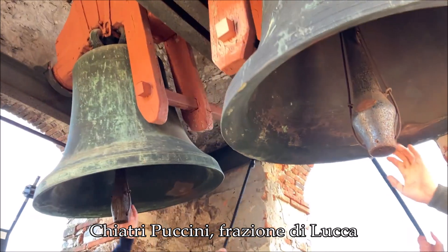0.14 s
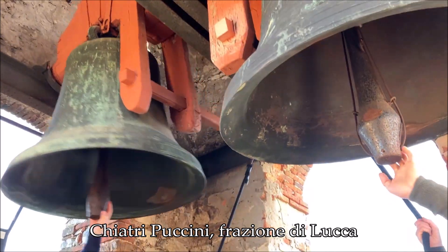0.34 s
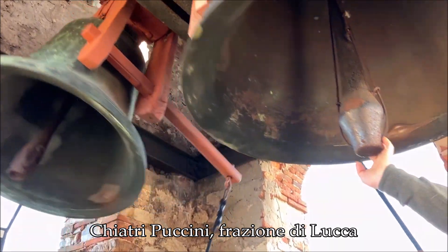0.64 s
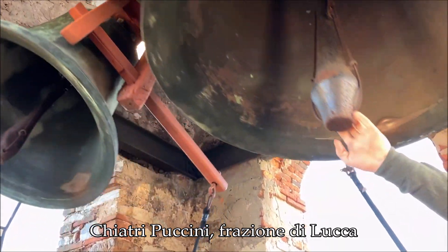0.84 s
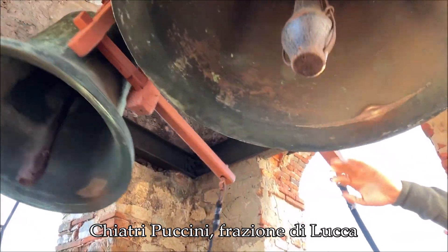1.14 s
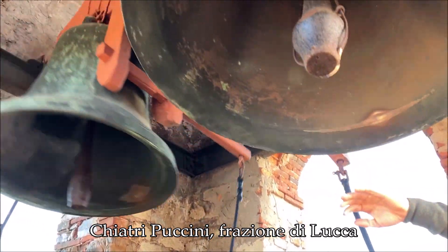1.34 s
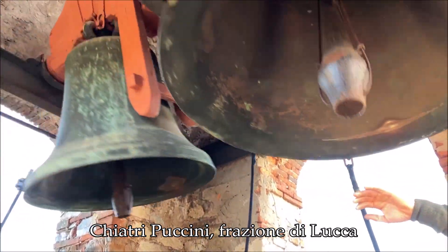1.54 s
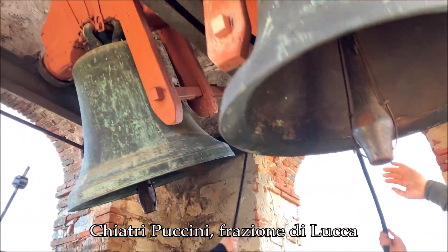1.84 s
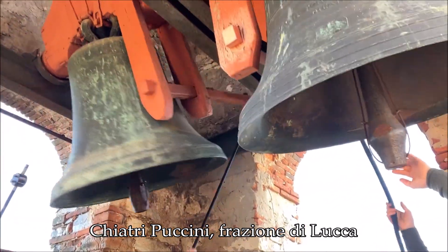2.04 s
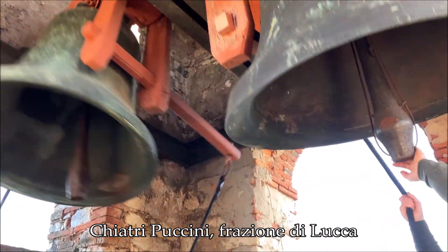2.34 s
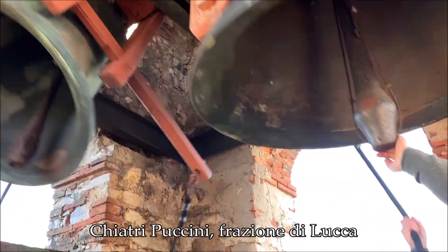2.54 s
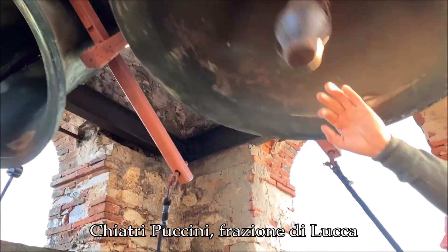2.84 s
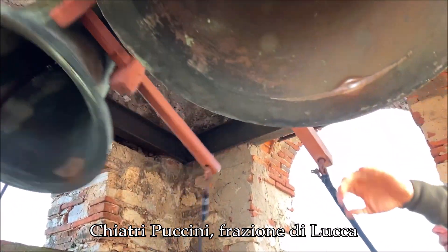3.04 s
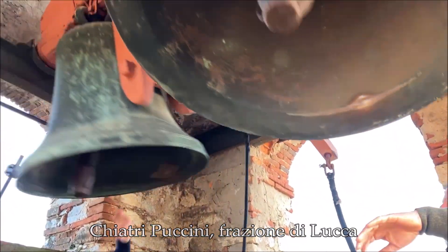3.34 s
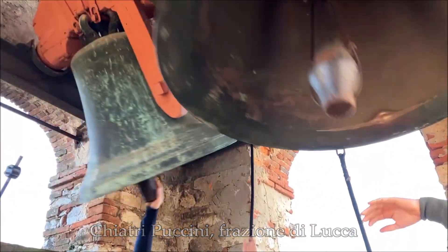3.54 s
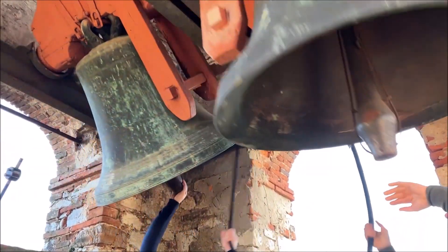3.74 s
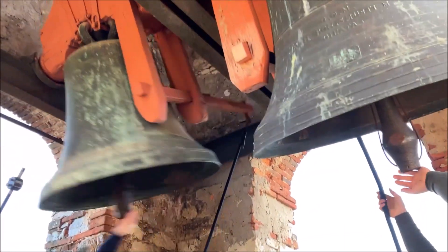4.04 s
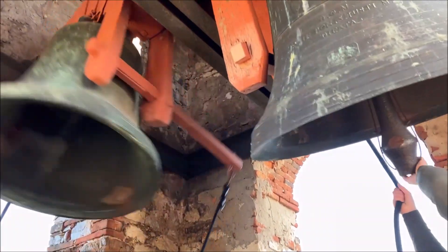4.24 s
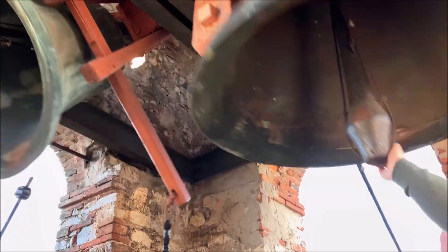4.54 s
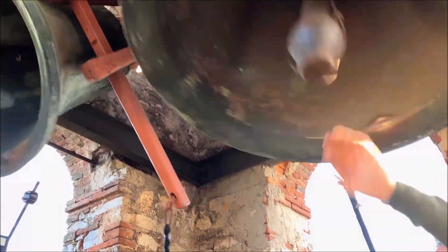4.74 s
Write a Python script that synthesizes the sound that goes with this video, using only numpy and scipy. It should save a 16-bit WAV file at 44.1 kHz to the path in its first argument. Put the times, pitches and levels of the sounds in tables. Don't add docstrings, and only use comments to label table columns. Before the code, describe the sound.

In an open stone belfry, bells swing by hand without sounding; one hears their wooden and iron mounts close to a stereo microphone. Faint rattles and a low creak open the scene, with a cluster of wooden knocks around 0.5-0.6 s. At about 0.85 s a hard, bright iron slam and tick bounce at once and ring briefly. Sparser strap knocks and light ticks follow from 1.2 to 1.9 s. Around 2.2-2.5 s come woody creaks, hollow thuds and a clank. Softer taps and a faint rising whine pass near 3 s, small pings at 3.4 s and a low groan at 3.5 s. From 3.7 to 4.3 s knocks and clanks crowd together, then a lighter slam at 4.5 s and last knocks near 4.7 s. Rope and sleeves rustle throughout; low wind buffets, strongest around 3.6 and 4.1 s, over faint outdoor hush and short wall echoes.

```python
import sys
import numpy as np
from scipy import signal
from scipy.fft import rfft, irfft
from scipy.io import wavfile
from scipy.ndimage import uniform_filter1d

SR = 44100
rng = np.random.default_rng(int(sys.argv[2]) if len(sys.argv) > 2 else 0)


def boost(x):
    u = np.asarray(x, float) / 20
    return 10 ** u


def store_wav(level_fs):
    pcm = np.round(np.clip(np.atleast_2d(level_fs), -1, 1) * 32767)
    wavfile.write(sys.argv[1], SR, pcm.T.astype(np.int16))


N = 215119

# pitch in Hz, level in dB, t60 in seconds.
BEAM_MODES = [(264, -1.5, 0.065), (339, -0.5, 0.1), (404.3, 0, 0.072), (458, -8, 0.034), (593, -12, 0.012)]
# pitch in Hz, level in dB, t60 in seconds.
PLANK_MODES = [(700, -4, .025), (803, 0, .035), (910, -2, .025), (1027, 0, .035), (1150, -2, .025),
               (1270, -2, .025), (1363, 0, .03), (1490, -2, .025)]
# pitch in Hz, level in dB, t60 in seconds.
IRON_MODES = [(1590, -1, .02), (1700, -1, .02), (1895, 0, .022), (2100, -2, .018), (2340, -2, .018),
              (2520, 0, .022), (2750, -2, .02), (2950, -5, .015), (3250, -7, .015), (3550, -7, .015),
              (3870, -8, .015), (4200, -9, .015), (4550, -8, .015)]
# frequency in Hz, level in dB per Hz.
SNAP_SPECTRUM = [(3000, -6.5), (4800, 9), (5500, 10), (7000, 9.5), (8000, -1), (10000, -5), (11700, 2.5),
                 (12300, -36)]

# start in seconds, beam level in dB, fitting level in dB, rattle t60 in seconds.
WOODEN_KNOCKS = [(.079, -57, -57.5, 0.49), (0.4883, -43, -43, 0.027), (0.5299, -51, -78, 0.21),
                 (0.6209, -54, -54.5, 0.14), (1.171, -72, -52.5, 0.034), (2.1699, -52.5, -86, 0.02),
                 (2.2439, -44.5, -44, 0.011), (2.2886, -47, -73, 0.03), (2.4382, -48, -57, 0.14),
                 (3.7483, -51, -50, 0.046), (3.82, -46, -43.5, 0.032), (3.966, -49, -52, 0.041),
                 (4.099, -53, -53.5, 0.11), (4.2343, -41, -66, 0.034), (4.6278, -58, -55, 0.51),
                 (4.7093, -46.5, -55, 0.046)]
# start in seconds, beam level in dB, fitting level in dB, rattle t60 in seconds.
STRAP_KNOCKS = [(0.5771, -44.5, -47.5, 0.076), (1.251, -55, -42, .14), (1.8696, -56.5, -56.5, 0.16),
                (2.4827, -47.5, -53.5, 0.12), (2.655, -84, -70, .1), (2.765, -79, -75, 0.04),
                (3.0393, -52.5, -67.5, 0.15), (3.3956, -48.5, -55.5, 0.06), (3.149, -57.5, -67.5, 0.12),
                (3.71, -54.5, -43, 0.079), (4.039, -80, -58, 0.11)]
# start in seconds, beam level in dB, fitting level in dB, rattle t60 in seconds.
IRON_CLANKS = [(0.1217, -50.5, -53, 0.18), (0.173, -62, -58.5, 0.18), (0.8389, -75, -34, 0.11),
               (2.3994, -41.5, -38, 0.02), (1.5989, -61.5, -63, 0.16), (2.1275, -61, -61.5, 0.11),
               (3.8322, -44, -38.5, 0.062), (3.878, -46, -50, 0.06), (4.1686, -46, -38.5, 0.011),
               (4.2082, -39.5, -37, 0.074), (4.2854, -43, -39, 0.016), (4.6778, -46, -45.5, 0.042)]
# start in seconds, beam level in dB, fitting level in dB, rattle t60 in seconds.
HOOK_TICKS = [
    (0.7612, -73, -58, 0.1),
    (0.8616, -45, -28, 0.072),
    (0.91, -66, -42.5, 0.17),
    (1.3305, -78, -52, 0.23),
    (1.552, -70, -55.5, 0.06),
    (1.799, -81, -60.5, 0.12),
    (4.3291, -51.5, -53.5, 0.036),
    (4.4452, -79, -59, 0.51),
]
# start in seconds, beam level in dB, fitting level in dB,
# rattle t60 in seconds.
LEVER_SLAMS = [
    (.843, -46.5, -30, .07),
    (.853, -58, -28, .05),
    (3.0835, -59, -57, .04),
    (4.5054, -60.5, -53, 0.11),
]
# snap level in dB, plank level in dB, iron level in dB.
BLOW_SHARES = [
    (-25, -0.5, -9.5),
    (-18, 0.5, 1),
    (-0.5, -2, -3),
    (0, -20, -12),
    (2.5, -13, -5),
]

# start in seconds, pitch in Hz, level in dB, t60 in seconds.
TAPPED_RINGS = [(.272, 392.7, -40, 0.1), (.49, 1875, -47, 0.04), (.49, 980, -45, .08),
                (.582, 1910, -43, 0.052), (.846, 1364, -34, 0.075), (.846, 1031, -34.5, 0.09),
                (.846, 2476, -28, 0.071), (1.872, 813, -48.5, 0.13), (2.243, 875, -29, 0.03),
                (2.4, 2577, -30.5, 0.034), (2.964, 2283, -58, 0.073), (.846, 1942, -32.5, 0.081),
                (4.212, 933, -38, 0.1), (4.29, 797, -41, 0.095), (3.709, 1675, -35.5, 0.033),
                (3.71, 2460, -41, 0.04), (3.721, 4350, -58, .15), (4.68, 1997, -53, 0.12)]
# start in seconds, pitch in Hz, level in dB, t60 in seconds.
BEARING_CREAKS = [
    (.292, 371.4, -40.5, 0.15),
    (0.931, 1535, -64, .5),
    (.95, 1018, -64, .4),
    (.95, 2500, -67, .4),
    (2.165, 832, -42, 0.12),
    (2.19, 356, -42, 0.17),
    (2.3, 350, -32.5, 0.089),
    (2.35, 355.5, -29.5, 0.055),
    (2.56, 1273, -68, 0.26),
    (3.835, 993, -32, 0.13),
]
# start in seconds, pitch in Hz, level in dB, t60 in seconds.
FRAME_GROANS = [
    (.598, 201.6, -51.5, 0.6),
    (2.422, 127, -33, 0.067),
    (3.526, 218.7, -44.5, 0.36),
    (3.556, 185.6, -40, 0.17),
    (3.599, 158.6, -43.5, 0.16),
    (3.639, 202.5, -51.5, 0.49),
    (4.698, 257.4, -37, 0.25),
]
# start in seconds, pitch in Hz, level in dB, t60 in seconds.
HOOK_PINGS = [(3.1, 1700, -58, 0.18), (3.39, 5070, -51, 0.12), (3.392, 5140, -55, 0.33),
              (4.213, 11000, -60, 0.23), (4.445, 11400, -60, .2), (3.394, 6000, -58, 0.13),
              (4.4, 7960, -62, 0.08), (3.392, 9600, -57, 0.27), (3.398, 10250, -55, .18),
              (3.4, 3300, -62, 0.16)]
# start in seconds, pitch in Hz, level in dB, t60 in seconds.
TIMBER_THUDS = [(2.168, 370, -39, 0.08), (2.245, 450, -35, 0.062), (2.283, 355, -34, 0.058),
                (2.399, 370, -27, .04), (2.414, 270, -26, .05), (2.437, 300, -27, .06),
                (2.48, 385, -46, .1), (3.822, 406, -31, .17), (3.843, 264, -30.5, 0.18),
                (3.885, 340, -36, .08), (4.07, 400, -46.5, 0.27), (4.21, 340, -29, .15),
                (4.235, 422, -34, 0.092), (4.29, 379, -43, .1), (4.32, 482, -41.5, 0.078),
                (4.2, 560, -39.5, .12), (4.24, 620, -44, .1), (4.285, 600, -43, 0.12),
                (4.22, 220, -39, .12), (2.26, 660, -44, 0.13), (2.304, 335, -33, .07),
                (2.405, 193, -34, .08), (2.415, 680, -48.5, 0.14), (2.49, 230, -40, .12),
                (2.2, 200, -49.5, 0.21), (3.845, 680, -41, 0.11), (3.95, 350, -46, 0.13),
                (3.405, 460, -51, 0.18), (.86, 560, -43, 0.11)]
# start in seconds, pitch in Hz, level in dB, t60 in seconds.
SHORT_REBOUNDS = [(.843, 1583, -36, 0.074), (.858, 1974, -32, 0.037), (.862, 3850, -38, 0.092),
                  (.846, 5220, -36, .09), (.872, 548, -39.5, .1), (.897, 1007, -37, 0.054),
                  (.907, 1493, -35, .06), (1.172, 990, -56, 0.085), (1.249, 900, -41, 0.13),
                  (1.262, 1386, -46, 0.069), (1.262, 760, -44.5, 0.093), (1.268, 3493, -47.5, 0.12),
                  (1.36, 3510, -56, .1), (2.285, 995, -49, .08), (2.4, 866, -41, 0.042),
                  (2.404, 1850, -40, 0.069), (2.44, 845, -48, 0.07), (2.48, 1300, -50, 0.097),
                  (3.818, 813, -38, 0.071), (3.935, 820, -46, .07), (3.963, 785, -37.5, 0.12),
                  (4.015, 826, -51, .08), (4.093, 820, -40, .07), (4.122, 827, -42, 0.065),
                  (4.168, 1860, -47, .04), (4.192, 846, -43, .06), (4.208, 1087, -40, .06),
                  (4.208, 1540, -46, 0.045), (4.208, 1860, -39, 0.062), (4.68, 2495, -53, .1)]
# rise in seconds, width as a share of the pitch,
# roughness from 0 to 1.
TONE_BLURS = [
    (0.002, .11, .75),
    (0.012, 0.045, .75),
    (0.0073, .17, .6),
    (0.003, .02, .6),
    (.008, .1, .3),
    (.005, .1, .6),
]
# start in seconds, length in seconds, start pitch in Hz,
# end pitch in Hz, level in dB.
BEARING_WHINES = [
    (2.889, 0.172, 1070, 1174, -66),
    (2.954, .11, 2280, 2360, -68),
]

# fastest moment in seconds, level in dB.
ROPE_PULLS = [(.2, -63), (.69, -58), (1.21, -56), (1.37, -61), (2.35, -51), (2.54, -75), (3.0, -55.5),
              (3.33, -60.5), (3.8, -53.5), (4.11, -49.5), (4.48, -56.5), (4.8, -52)]
# fastest moment in seconds, level in dB.
SLEEVE_BRUSHES = [(.15, -57), (.5, -57), (.88, -54.5), (1.37, -51.5), (1.9, -66), (2.4, -64), (2.85, -62),
                  (3.0, -57.5), (3.88, -54.5), (4.2, -58), (4.88, -49)]

# frequency in Hz, t60 in seconds.
WALL_DECAY = [(200, 0.3), (1000, 0.31), (3000, 0.22), (8000, 0.16)]

# frequency in Hz, level in dB per Hz.
GUST_SPECTRUM = [(22, -72), (33, -11), (45, 2), (90, 2), (115, -3), (160, -10.5), (300, -56)]
# time in seconds, level in dB.
BREEZE_LEVEL = [(0, -78), (.15, -50), (.4, -70), (.75, -49.5), (1.1, -76), (1.502, -53.5), (1.8, -71),
                (2.1, -54), (3.0, -59), (3.4, -48.5), (4.4, -43), (4.88, -45.5)]
# peak in seconds, level in dB.
WIND_BUFFETS = [(.26, -59), (.61, -40.5), (1.25, -48.5), (1.44, -61), (2.08, -46.5), (2.27, -46.5),
                (2.43, -35.5), (2.63, -46), (2.89, -51), (3.07, -49), (3.16, -41), (3.56, -31.5),
                (3.61, -34), (3.73, -42.5), (3.86, -50), (3.95, -53), (4.1, -28.5), (4.17, -43),
                (4.62, -44), (4.73, -38), (4.79, -40)]
# peak in seconds, level in dB.
FRAME_JOLTS = [(.1, -56), (.26, -69), (.48, -50), (.76, -47), (1.25, -51), (1.4, -50), (2.17, -56),
               (2.39, -43.5), (2.58, -47), (2.75, -51), (3.07, -52.5), (3.42, -44.5), (3.69, -52),
               (3.86, -43), (4.1, -42), (4.2, -44), (4.66, -43.5), (4.88, -42)]
# frequency in Hz, level in dB per Hz.
AIR_SPECTRUM = [(25, -46), (45, -8), (97, 0.5), (300, -11), (1140, -27.5), (2500, -31.5), (4200, -33.5),
                (5500, -39.5), (7000, -27.5), (9000, -39.5), (12000, -32.5)]

# frequency in Hz, share of the side that is the mid
COMMON_SIDE = [(60, .6), (300, .4), (2000, .2), (4500, .35), (6000, .7), (7000, 1.1)]
# frequency in Hz, side minus mid in dB.
SIDE_LEVEL = [(40, -11.5), (130, -18), (250, -8), (500, -5.5), (1000, -1.5), (2000, 0), (4000, 0.5),
              (6000, -1), (9000, 3), (10300, 4), (11000, -19)]
# frequency in Hz, left minus right in dB.
PORT_LEAN = [(60, 0.5), (170, -0.5), (500, 1.5), (1460, 2.5), (4230, 0), (12300, -1)]
# mid 0 or side 1, low edge in Hz, high edge in
# Hz.
EMPTY_BANDS = [(0, 8400, 9900), (0, 11850, 14000), (1, 6700, 7650), (1, 10450, 14000)]
# frequency in Hz, share of the time.
BAND_DROPOUTS = [(1500, 0), (2500, .06), (4500, .13), (5500, .33), (6300, .12), (8000, .05), (12000, .06)]


def evened(x):
    return x / np.sqrt(np.mean(x ** 2) + 1e-20)


def read(points, hz):
    f, value = np.transpose(points)
    return np.interp(np.log(hz + 1), np.log(f + 1), value)


def add(mix, s, sound):
    part = mix[round(s * SR):][:len(sound)]
    part += sound[:len(part)]


def coloured(x, points):
    return irfft(rfft(x) * boost(read(points, np.fft.rfftfreq(len(x), 1 / SR))), len(x))


def lumpy(per_s, depth_db):
    size = max(int(SR / per_s), 1)
    slow = uniform_filter1d(rng.standard_normal(N), size)
    return boost(depth_db * evened(uniform_filter1d(slow, size)))


def swells(events, rise_db_s, fall_db_s, rest_db):
    t = np.arange(0, N + 64, 64) / SR
    power = np.full(len(t), boost(2 * rest_db))
    for s, db in events:
        below_db = np.where(t < s, rise_db_s * (s - t), fall_db_s * (t - s))
        power += boost(2 * (db - below_db))
    return np.interp(np.arange(N) / SR, t, np.sqrt(power))


def ring(modes, drive, detune, crash_db, top):
    t = np.arange(4000) / SR
    body = np.zeros(len(t))
    shifts = rng.standard_normal((len(modes), 2))
    for k, ((hz, db, t60), (pitch_shift, level_shift)) in enumerate(zip(modes, shifts)):
        sign = (-1) ** k
        decay = boost(db + 1.6 * level_shift - 60 * t / abs(t60))
        body += sign * decay * np.sin(2 * np.pi * hz * (1 + detune * pitch_shift) * t)
    edges = [modes[0][0] * .85, modes[-1][0] * top]
    band = signal.butter(3, edges, "band", fs=SR, output="sos")
    loose = drive * rng.choice([-1., 1.], len(drive))
    tones = signal.fftconvolve(drive, body)[:len(drive)]
    crash = signal.sosfilt(band, loose)
    tones = tones / np.sqrt(np.mean(tones[:1200] ** 2) + 1e-20)
    crash = crash / np.sqrt(np.mean(crash[:1200] ** 2) + 1e-20)
    return tones + boost(crash_db) * crash


def knocks():
    out, t = np.zeros(N), np.arange(16000) / SR
    kinds = [WOODEN_KNOCKS, STRAP_KNOCKS, IRON_CLANKS, HOOK_TICKS, LEVER_SLAMS]
    for rows, shares in zip(kinds, BLOW_SHARES):
        for s, beam_db, fitting_db, t60 in rows:
            snap_db, plank_db, iron_db = fitting_db + np.array(shares)
            creep_db = 2600 * np.maximum(.014 - t, 0)
            decay_db = 60 * np.maximum(t - .017, 0) / max(t60, .01)
            shape = boost(-creep_db - decay_db)
            hard = rng.random(len(t)) < 2500 / SR
            blows = rng.standard_normal(len(t)) * (.7 + hard * 1.2)
            drive = blows * shape
            beam = ring(BEAM_MODES, drive, 0.029, crash_db=-2.0, top=1.144)
            plank = ring(PLANK_MODES, drive, 0.045, crash_db=0.5, top=0.96)
            iron = ring(IRON_MODES, drive, 0.04, crash_db=-4.0, top=0.86)
            snap = evened(coloured(blows, SNAP_SPECTRUM)) * shape * 1.33
            wood = boost(beam_db - 7.0) * beam + boost(plank_db - 10.5) * plank
            metal = boost(iron_db - 9.5) * iron + boost(snap_db - 11.5) * snap
            add(out, s - .012, wood + metal)
    return out


def squeaks():
    out, t = np.zeros(N), np.arange(16000) / SR
    kinds = [TAPPED_RINGS, BEARING_CREAKS, FRAME_GROANS, HOOK_PINGS, TIMBER_THUDS, SHORT_REBOUNDS]
    for rows, (rise, share, rough) in zip(kinds, TONE_BLURS):
        for s, hz, db, t60 in rows:
            size = max(int(SR / (share * hz) / 2), 1)
            chance = uniform_filter1d(rng.standard_normal((2, len(t))), size)
            blur = .85 + rough * (evened(chance[0]) + 1j * evened(chance[1]))
            tone = (blur * np.exp(2j * np.pi * hz * t)).real
            shape = boost(db - 60 * t / t60) * np.minimum(t / rise, 1) ** 2
            add(out, s, shape * tone)
    return out


def whines():
    out = np.zeros(N)
    for s, length, start_hz, end_hz, db in BEARING_WHINES:
        waver = evened(uniform_filter1d(rng.standard_normal((2, 12000)), size=220))
        u = np.clip(np.arange(12000) / SR / length, 0, 1)
        hz = (start_hz + (end_hz - start_hz) * u) * (1 + 0.013 * waver[0])
        swell = boost(db + 5.2 * waver[1]) * np.sqrt(np.sin(np.pi * u).clip(0))
        add(out, s, swell * np.sin(2 * np.pi * np.cumsum(hz) / SR))
    return out


def rustle():
    grains = rng.standard_normal((2, N)) * lumpy(120, 1.0)
    rope = coloured(grains[0], [(250, 4.5), (500, 1.5), (1200, -9.5), (3000, -20.0), (5000, -31)])
    cloth = coloured(grains[1], [(2000, 8.5), (4000, 17.5), (7500, -0.5), (10000, -7.0), (12500, 6)])
    pulls = swells(ROPE_PULLS, rise_db_s=100, fall_db_s=59, rest_db=-69)
    sleeves = swells(SLEEVE_BRUSHES, rise_db_s=114, fall_db_s=127, rest_db=-69.5)
    return boost(-3.0) * pulls * evened(rope) + boost(-10.0) * sleeves * evened(cloth)


def echo(x):
    out = np.zeros(N)
    turn = np.arange(N) / SR * 2.3
    for k in range(3):
        taps = np.zeros(SR // 2)
        at = np.arange(260, len(taps) - 20, 20)
        taps[at + rng.integers(0, 20, len(at))] = rng.choice([-1., 1.], len(at))
        hz, t, z = signal.stft(taps, SR, nperseg=256)
        decay = boost(-60 * t / read(WALL_DECAY, hz)[:, None])
        tail = signal.istft(z * decay, SR, nperseg=256)[1]
        share = np.cos(np.pi * (turn + k / 3)) * np.sqrt(2 / 3)
        out += signal.oaconvolve(x * share, tail / np.linalg.norm(tail))[:N]
    return out


def wind():
    gust = evened(coloured(rng.standard_normal(N) * lumpy(32, 0.54), GUST_SPECTRUM))
    thud = coloured(rng.standard_normal(N) * lumpy(46, 1), [(70, -61), (115, 6.0), (240, -0.5), (350, -26.0)])
    breeze = boost(np.interp(np.arange(N) / SR, *np.transpose(BREEZE_LEVEL)))
    buffets = swells(WIND_BUFFETS, rise_db_s=278, fall_db_s=289, rest_db=-85)
    jolts = swells(FRAME_JOLTS, rise_db_s=204, fall_db_s=74, rest_db=-60)
    return boost(-6.5) * np.hypot(breeze, buffets) * gust + boost(-11.0) * jolts * evened(thud)


def air():
    hz, t, z = signal.stft(coloured(rng.standard_normal(N), AIR_SPECTRUM), SR, nperseg=512)
    patches = uniform_filter1d(rng.standard_normal(z.shape), size=4, axis=0)
    patches = uniform_filter1d(patches, size=12, axis=1)
    hush = signal.istft(z * boost(2.5 * evened(patches)), SR, nperseg=512)[1][:N]
    return boost(-60.0) * evened(hush) * lumpy(0.81, 1.0)


def belfry():
    blows = knocks()
    tones = squeaks() + whines()
    walls = boost(-4.0) * echo(blows + 0.72 * tones)
    return blows + tones + walls + rustle() + wind() + air()


def scene():
    hz = np.fft.rfftfreq(N, 1 / SR)
    mid, other = rfft(belfry()), rfft(belfry())
    same = np.clip(read(COMMON_SIDE, hz), 0, 1)
    side = boost(read(SIDE_LEVEL, hz)) * (np.sqrt(1 - same ** 2) * other - 1j * same * mid)
    lean = boost(read(PORT_LEAN, hz) / 2)
    return irfft(np.array([(mid + side) * lean, (mid - side) / lean]), N)


def thinned(x):
    mid_side = np.array([x[0] + x[1], x[0] - x[1]]) / 2
    hz, t, z = signal.stft(mid_side, SR, nperseg=1024)
    luck = rng.random((2, len(hz) // 4 + 1, len(t) // 4 + 1)).repeat(4, axis=1).repeat(4, axis=2)
    keep = luck[:, :len(hz), :len(t)] > read(BAND_DROPOUTS, hz)[:, None]
    for k, (channel, low, high) in enumerate(EMPTY_BANDS):
        wander = 130 * rng.standard_normal((2, len(t) // 3 + 1)).repeat(3, axis=1)[:, :len(t)]
        band = (hz[:, None] > low + wander[0]) & (hz[:, None] < high + wander[1])
        inside = abs(z[channel][(hz > low) & (hz < high)])
        loud_db = 20 * np.log10(np.median(inside, axis=0) + 1e-10)
        usual_db = np.median(loud_db)
        attack = (loud_db - np.roll(loud_db, shift=2) > 9) & (loud_db > usual_db + 11)
        passes = ~band | attack
        if k == 0:
            passes |= abs(z[channel]) ** 2 > 40 * boost(2 * np.maximum(loud_db - 4, usual_db))
        keep[channel] &= passes
    mid, side = signal.istft(z * keep, SR, nperseg=1024)[1][:, :N]
    return np.array([mid + side, mid - side])


def roll_off(x):
    return signal.sosfilt(signal.butter(12, 12860, fs=SR, output="sos"), x)


def record(dry):
    edge = signal.firwin(511, 12900, window=("kaiser", 9), fs=SR)
    low_cut = signal.butter(4, 34, "high", fs=SR, output="sos")
    heard = signal.sosfilt(low_cut, signal.oaconvolve(dry, edge[None], "same"))
    mix = thinned(heard)
    return roll_off(mix)


dry = scene()
out = record(dry)
store_wav(out)
```